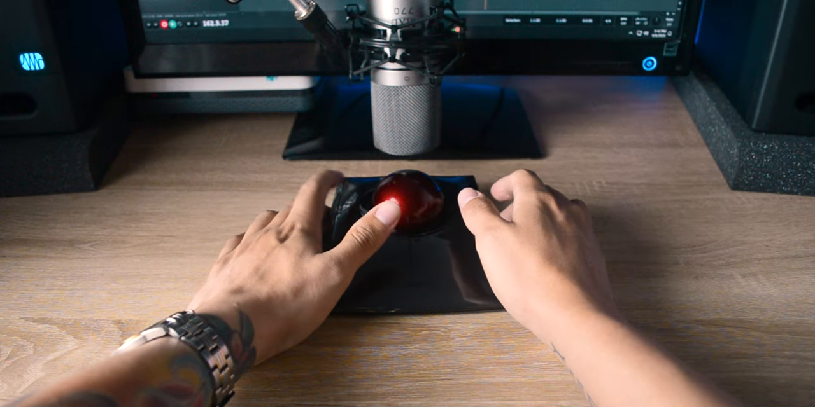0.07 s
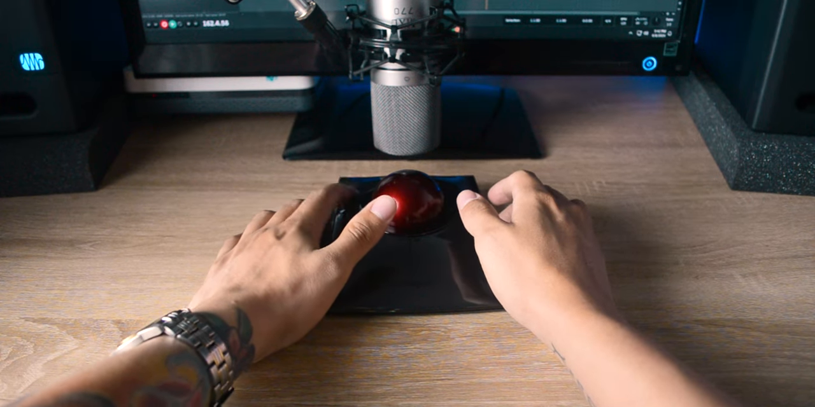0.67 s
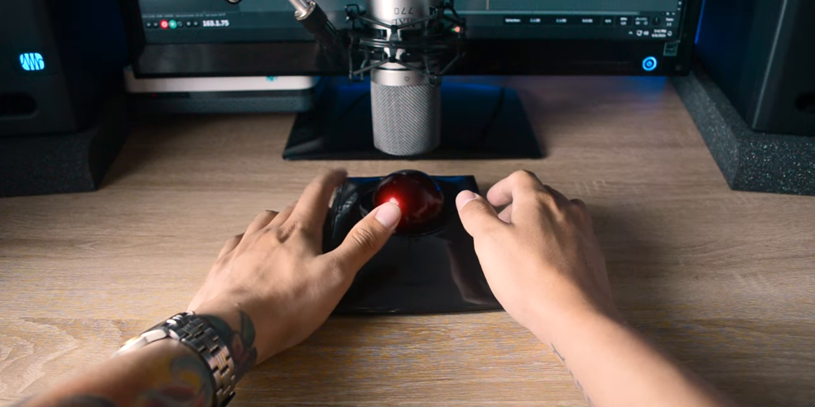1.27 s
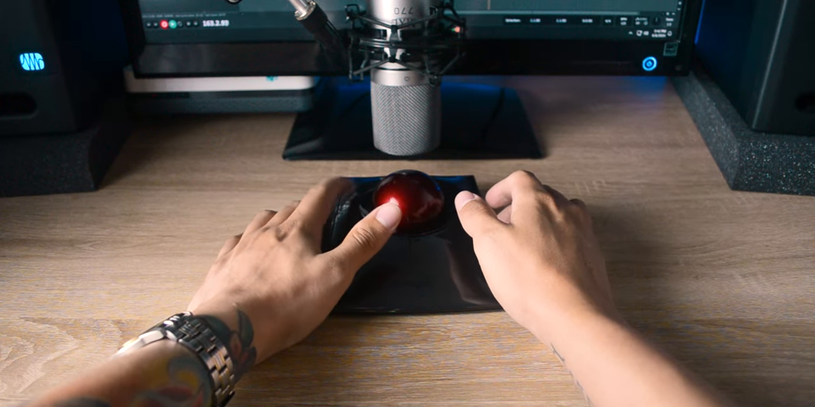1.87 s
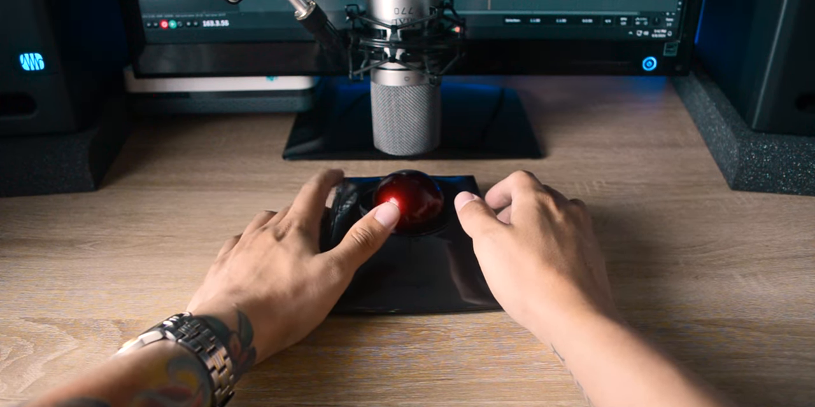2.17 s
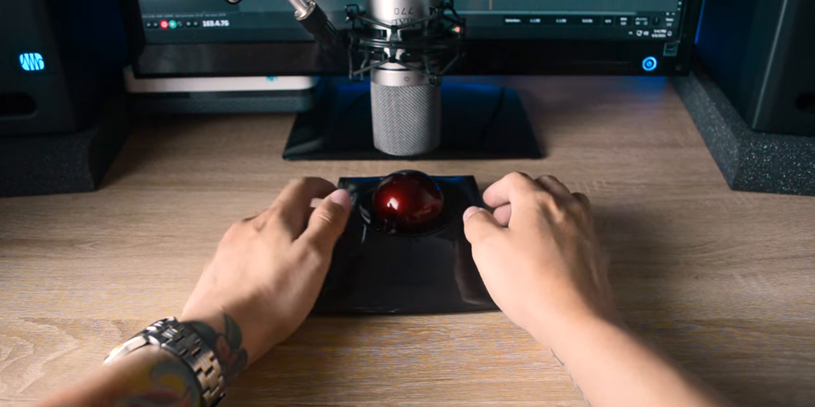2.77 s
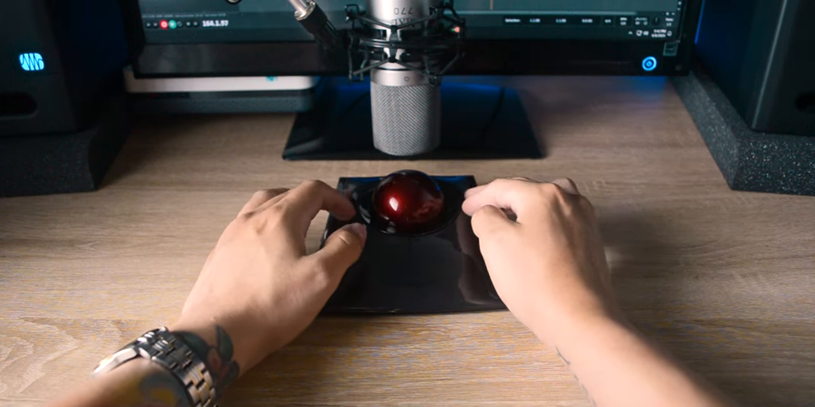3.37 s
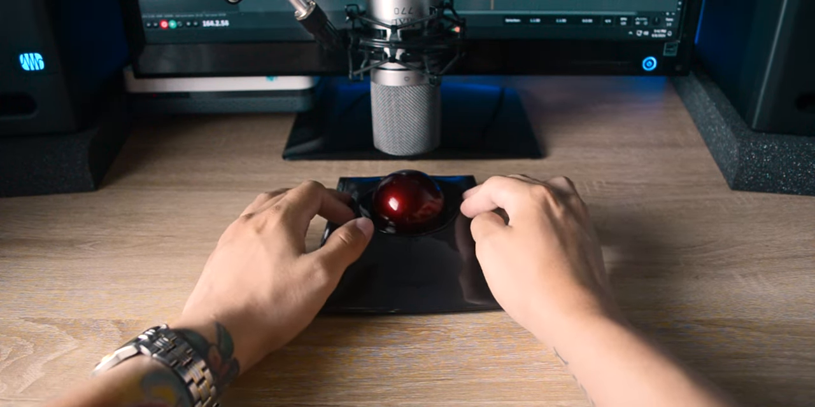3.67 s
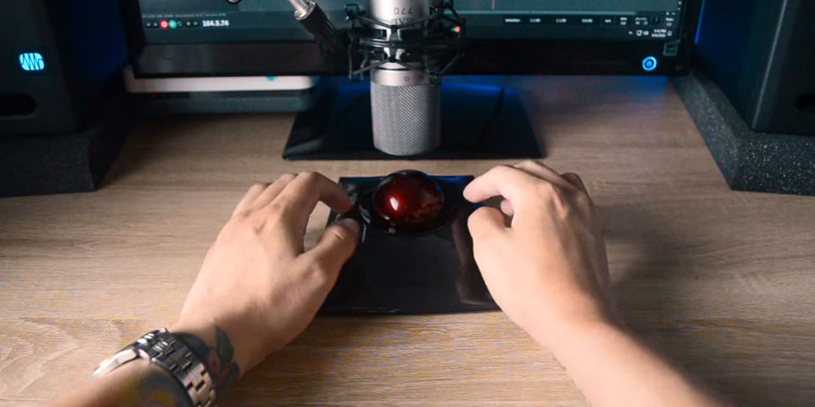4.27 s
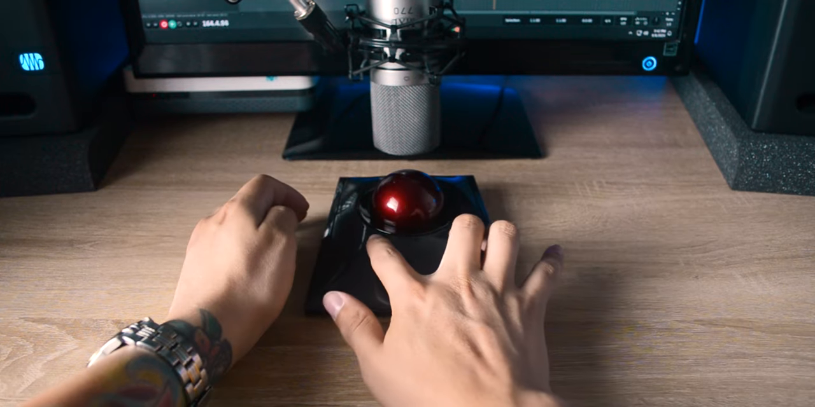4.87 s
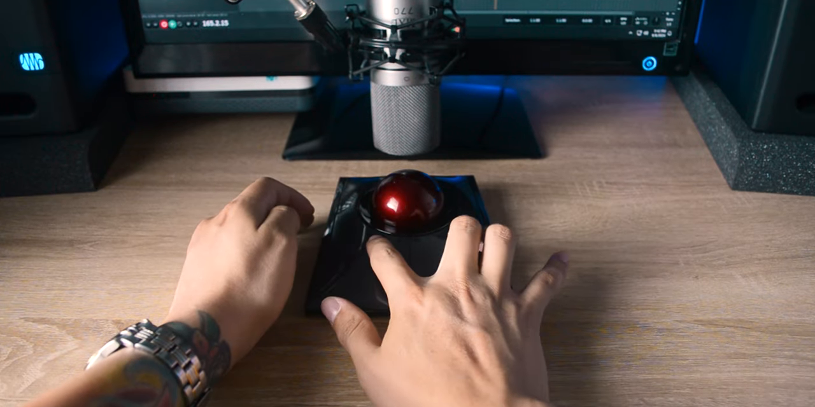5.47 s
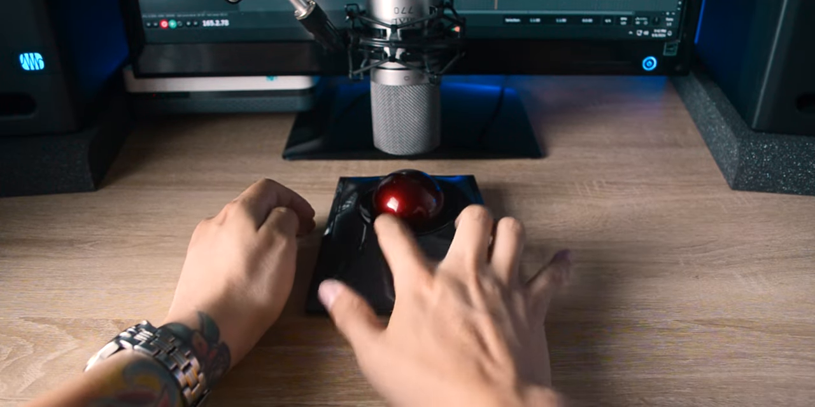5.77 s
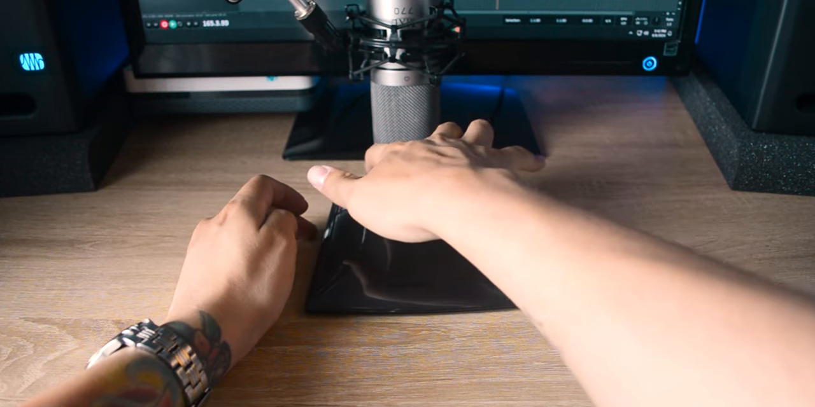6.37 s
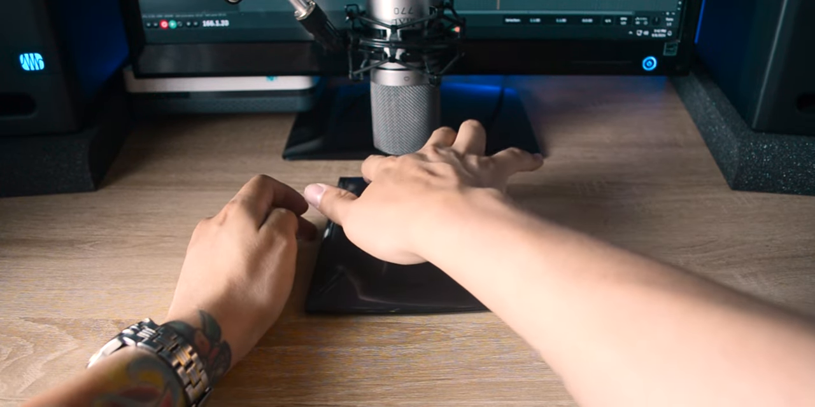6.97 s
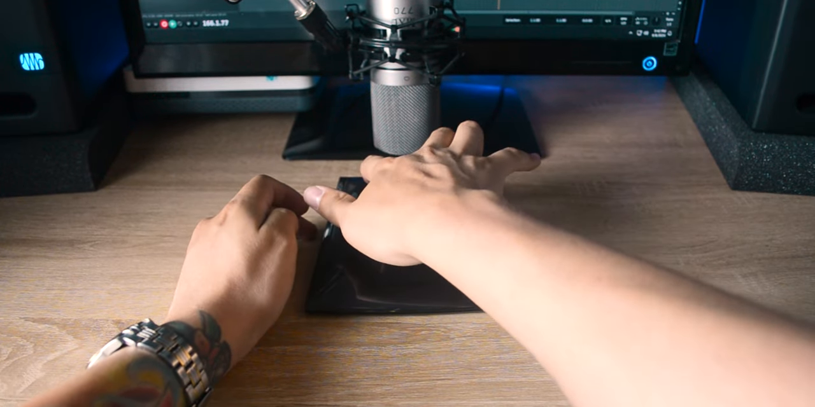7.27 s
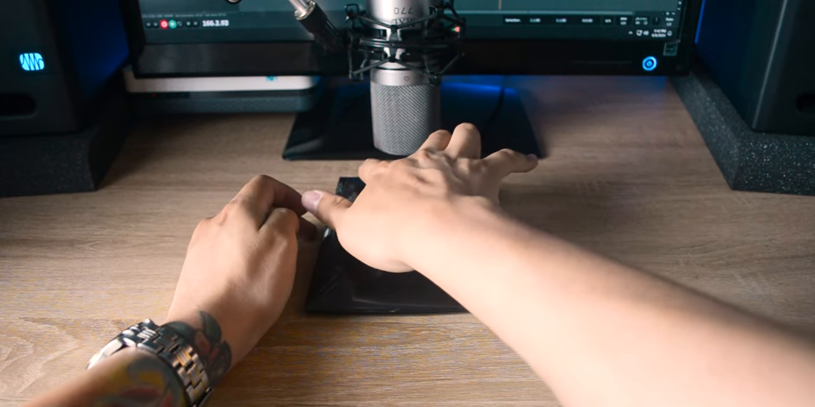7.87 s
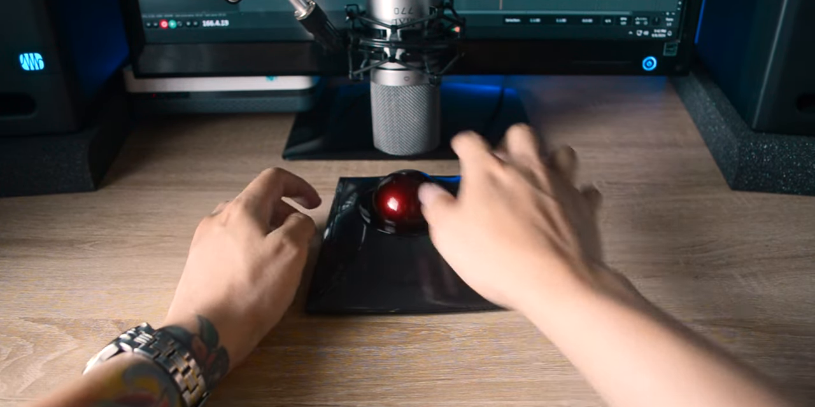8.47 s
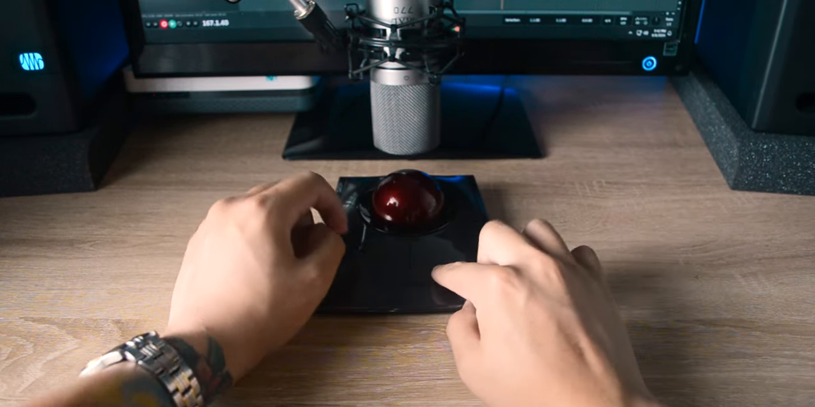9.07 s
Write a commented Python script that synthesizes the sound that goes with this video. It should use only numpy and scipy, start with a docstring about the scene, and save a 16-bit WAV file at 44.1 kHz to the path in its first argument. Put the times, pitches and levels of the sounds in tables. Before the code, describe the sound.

A trackball on a wooden desk is clicked close to a microphone in a quiet room. First one button snaps down and springs back in a quick, even run. After a pause the scroll wheel ticks through four notches, then a small button gives six faster clicks with dull thumps. A last button clicks about seven times, bright and steady. Light finger knocks and faint rustles on the plastic housing fall between the runs.

```python
"""Trackball buttons click one after another on a wooden desk, close under a studio microphone:
the left button, the scroll wheel, a small extra button, then the right button.
Each switch snaps brightly and knocks the plastic shell, which rings and shakes the desk.
Between the clicks, fingers tick, knock and rustle on the housing in a quiet room."""
import sys
import numpy as np
from scipy import signal
from scipy.fft import rfft, irfft
from scipy.io import wavfile
from scipy.ndimage import uniform_filter1d

SR = 44100
rng = np.random.default_rng(int(sys.argv[2]) if len(sys.argv) > 2 else 0)


def waveform_to_disk(signal):
    """Save audio, clipped to [-1, 1], as 16-bit WAV at the path in sys.argv[1]."""
    frames = np.transpose(np.atleast_2d(signal))
    scaled = np.clip(frames, -1, 1) * 32767
    samples = np.round(scaled).astype(np.int16)
    wavfile.write(sys.argv[1], SR, samples)


N = 406602
SIZE, LEAD = 16384, 2048  # samples in one stroke's buffer, and of those ahead of the contact
HZ = np.fft.rfftfreq(SIZE, 1 / SR)
AGE = (np.arange(SIZE) - LEAD) / SR  # seconds since the contact

# Right button going down, ever slower. Each row: start in seconds, travel to the stop in seconds.
RIGHT_DOWN = [(6.5722, 0.0029), (6.8642, 0.0033), (7.142, .012), (7.4018, .0157), (7.6761, .0189),
              (7.9648, 0.025), (8.222, 0.05)]
# Right button coming up. Each row: start in seconds, travel to rest in seconds, snap in dB.
RIGHT_UP = [(6.4272, 0.0023, -21.5), (6.7242, 0.0029, -23), (6.9917, 0.021, -24), (7.2705, 0.0027, -24),
            (7.5268, .0261, -24.5), (7.8091, 0.033, -26), (8.082, 0.023, -25.5)]


def left_button(bite_db=1.65, return_snap_db=-26.5):
    """A press snaps and knocks with the finger's force; the spring snaps back equally loud each time."""
    # Each row: press in seconds, release in seconds, force in dB, knock of the returning cap in dB.
    clicks = [(-.11, -0.004, -19, -32.5), (0.1481, 0.2492, -16.5, -37), (0.3723, 0.4702, -24, -35),
              (0.5935, 0.693, -16.5, -29), (0.8344, 0.9214, -18, -29), (1.0613, 1.1568, -23.5, -32.5),
              (1.2955, 1.3866, -16, -29), (1.543, 1.6307, -20.5, -40.5), (1.7545, 1.8436, -25, -28),
              (1.9878, 2.0688, -22.5, -28.5), (2.2043, 2.2842, -17, -29), (2.4301, 2.535, -15.5, -28)]
    # Broad tone of press and release. Each row: frequency in Hz, level in dB.
    press_colour = [(71, -58.5), (120, -23.5), (400, -12.5), (493, -5.5), (656, 2), (874, -7.5), (1520, -4),
                    (2020, -12), (2430, -7.5), (2700, -8), (4230, -22), (5300, -16.5), (8660, -18),
                    (12300, -26), (16000, -31)]
    release_colour = [(88, -62.5), (150, -29.5), (649, 0.5), (821, -18.5), (941, -9.5), (1260, -7.5),
                      (1660, -3.5), (3700, -24), (5680, -13), (10200, -16), (11700, -18.5), (12400, -29),
                      (14500, -16), (16000, -35.5)]
    # Their resonances. Each row: frequency in Hz, width in Hz, strength in dB.
    press_rings = [(345, 8.8, 4.5), (648, 45, 7), (1044, 70, 9), (1263, 35, 8), (1520, 220, 5),
                   (1923, 45, 10.5), (2397, 62, 9.5), (2940, 38, 1.5), (6270, 230, 4), (6850, 530, 5)]
    release_rings = [(343, 29, 1.4), (627, 23, 7), (947, 72, 11), (1380, 60, 2), (1590, 23, 4.6),
                     (2500, 55, 6.1), (5820, 130, 11), (7370, 140, 2), (8760, 280, 7.1), (11540, 150, 20),
                     (14110, 73, 9)]
    presses = [(s, force_db + bite_db, force_db) for s, _, force_db, _ in clicks]
    releases = [(s, return_snap_db, knock_db) for _, s, _, knock_db in clicks]
    down = switch(presses, press_colour, press_rings, rise_ms=0.82, snap_ms=3.3, shell_ms=4, lag_ms=0.5,
                  snap_tail=(-21, 0.13), shell_tail=(-14, 0.12), bend=1.8, desk_db=-27,
                  hiss_db=-19, hiss_s=0.0014, tail_follow=0.85)
    up = switch(releases, release_colour, release_rings, rise_ms=0.062, snap_ms=3, shell_ms=13,
                lag_ms=3.9, snap_tail=(-19.5, 0.06), shell_tail=(-14, 0.031), bend=2.2, desk_db=-33,
                hiss_db=-24.5, hiss_s=0.017)
    return down + up + spring(clicks)


def spring(clicks, waver_s=0.008):
    """The left button's bent spring buzzes thinly until the finger lets go."""
    # Each row: frequency in Hz, level against the force in dB, 60 dB decay in seconds.
    modes = [(1210, -33, 0.36), (1570, -31, .3), (4310, -44.5, 0.28), (6760, -46.5, .35)]
    out = np.zeros(N)
    for s, release_s, force_db, _ in clicks:
        wavers = smooth_noise((len(modes), SIZE), round(waver_s * SR))
        buzz = sum(amp(db) * ring(hz, t60) * waver / rms(waver)
                   for (hz, db, t60), waver in zip(modes, wavers))
        add(out, s + AGE[0], amp(force_db) * buzz * (AGE < release_s - s))
    return out


def scroll_wheel(settle_s=0.008, snap_share=0.2):
    """At every notch the detent lifts, drops, bounces and settles; force goes mostly into the shell."""
    # Each row: start, ride over the tooth and bounce, all in seconds, then force in dB.
    notches = [(3.4809, 0.02, 0.0068, -0.9), (3.679, 0.02, 0.0031, -3), (3.9153, .0054, .0101, 1.1),
               (4.1113, 0.0029, 0.0053, 4.5)]
    # The four contacts of a notch. Each row: snap in dB, knock in dB.
    contacts = [(-28, -33.5), (-24, -31.5), (-24.5, -34), (-30, -30.5)]
    # Broad tone. Each row: frequency in Hz, level in dB.
    colour = [(71, -41), (120, -21.5), (483, -10), (617, -0.5), (1580, -10.5), (2380, -18.5), (3660, -16),
              (4410, -12), (5520, -1.5), (6240, -4), (7350, -2), (7980, -2), (13900, -10.5), (16000, -15)]
    # Resonances. Each row: frequency in Hz, width in Hz, strength in dB.
    rings = [(353, 110, 5), (570, 18, -2), (750, 19, 0), (1400, 120, -16), (2310, 250, 8.5),
             (5840, 640, -0.5), (7300, 400, 2), (11700, 470, 6)]
    strokes = []
    for s, ride_s, bounce_s, force_db in notches:
        times = s + np.cumsum([0, ride_s, bounce_s, settle_s])
        for at, (snap_db, knock_db) in zip(times, contacts):
            strokes.append((at, snap_db + snap_share * force_db, knock_db + force_db))
    return switch(strokes, colour, rings, rise_ms=0.48, snap_ms=1.46, shell_ms=2.34,
                  snap_tail=(-19.5, 0.24), shell_tail=(-12, 0.18), bend=0.49, desk_db=-30)


def small_button(muffle=0.74, thump_hz=160, thump_t60=0.13):
    """A firm finger muffles the switch and hits the stop harder, where the housing thumps and rings."""
    # Each row: start in seconds, travel to the stop in seconds, force in dB, housing thump in dB.
    presses = [(4.9494, 0.011, -3.1, -39), (5.1034, .0072, 0.1, -58), (5.2546, 0.013, -4.5, -37.5),
               (5.385, 0.019, -0.4, -47), (5.5256, .0128, -5, -36), (5.6855, 0.0096, 0.3, -49)]
    # The switch trips, then the cap meets the stop. Each row: snap in dB, knock in dB.
    contacts = [(-30.5, -31.5), (-24, -34.5)]
    # Broad tone. Each row: frequency in Hz, level in dB.
    colour = [(30, -42), (71, -32), (120, -11), (321, -15), (712, 4.5), (911, -2.5), (2020, -13),
              (3310, -15), (5870, -7.5), (6500, -9), (7200, -3), (8840, -5.5), (9590, -5.5), (10400, -8.5),
              (16000, -14)]
    # Resonances. Each row: frequency in Hz, width in Hz, strength in dB.
    rings = [(574, 19, 1), (1950, 58, 2), (6040, 240, 5.5), (7200, 380, 5.5), (9550, 400, 5.5),
             (13600, 900, 5)]
    (trip_snap_db, trip_knock_db), (stop_snap_db, stop_knock_db) = contacts
    strokes, thumps = [], []
    for s, travel_s, force_db, thump_db in presses:
        strokes.append((s, trip_snap_db - muffle * force_db, trip_knock_db + force_db))
        strokes.append((s + travel_s, stop_snap_db + force_db, stop_knock_db + force_db))
        thumps.append((s + travel_s, thump_db, thump_hz, thump_t60))
    clicks = switch(strokes, colour, rings, rise_ms=0.62, snap_ms=1.5, shell_ms=2.1,
                    snap_tail=(-19, 0.25), shell_tail=(-14.5, 0.22), bend=0.63, desk_db=-24.5)
    return clicks + knocks(thumps) + hollow_shell([s for s, *_ in thumps], db=-32.5, hz=635, t60=0.078)


def right_button(settle_s=0.035, return_knock_db=-42.5, rest_snap_db=-28, rest_knock_db=-48):
    """Two contacts going down and two coming up; the slower the finger, the further apart they fall."""
    # The switch trips, then the cap meets the stop. Each row: snap in dB, knock in dB.
    contacts = [(-25, -29), (-22.3, -25.5)]
    # Broad tone of press and release. Each row: frequency in Hz, level in dB.
    press_colour = [(88, -64), (150, -39.5), (545, 0.5), (689, -5.5), (979, 1), (1340, -3), (2220, -6.5),
                    (4240, -13), (5460, -3.5), (6390, -3.5), (7180, -0.5), (10400, -6.5), (11700, -3),
                    (16000, -20)]
    release_colour = [(71, -64), (120, -17.5), (463, -13.5), (822, -11), (1190, -14.5), (2200, -18),
                      (4060, -21), (5410, -11.5), (6240, -6), (7350, -5), (7980, -8), (13300, -6),
                      (14700, -12), (16000, -13)]
    # Resonances with the cap free, at the stop and returning.
    # Each row: frequency in Hz, width in Hz, strength in dB.
    trip_rings = [(362, 43, 10.5), (959, 26, 8.5), (1860, 47, 8.5), (8700, 400, 1), (12700, 510, -13.5)]
    stop_rings = [(323, 50, 2), (558, 25, 5.5), (1023, 26, 2.5), (1920, 41, 7), (2290, 470, 10),
                  (5500, 240, 6), (7230, 320, 2), (12700, 510, -14)]
    release_rings = [(815, 19, 1.5), (1070, 27, -16), (5500, 440, 9), (7200, 153, -6), (7370, 380, 9),
                     (8440, 250, 4.5), (14500, 880, -23)]
    trip, stop = contacts
    trips = [(s, *trip) for s, _ in RIGHT_DOWN]
    stops = [(s + travel_s, *stop) for s, travel_s in RIGHT_DOWN]
    releases = []
    for s, travel_s, snap_db in RIGHT_UP:
        releases += [(s, snap_db, return_knock_db), (s + travel_s, rest_snap_db, rest_knock_db)]
    out = switch(trips, press_colour, trip_rings, rise_ms=0.68, snap_ms=1.6, shell_ms=5, lag_ms=0.15,
                 snap_tail=(-21.5, 0.091), shell_tail=(-11.5, 0.065), bend=0.57, desk_db=-36.5)
    out += switch(stops, press_colour, stop_rings, rise_ms=0.87, snap_ms=1.1, shell_ms=2.2, lag_ms=0.17,
                  snap_tail=(-25, 0.047), shell_tail=(-15.5, 0.087), bend=0.43, desk_db=-43)
    out += switch(releases, release_colour, release_rings, rise_ms=0.65, snap_ms=1.434, shell_ms=3.56,
                  snap_tail=(-22, 0.052), shell_tail=(-10.5, 0.044), bend=2.26, desk_db=-16)
    return out + hollow_shell([s + settle_s for s, *_ in stops], db=-44.5, hz=640, t60=0.085)


def switch(strokes, colour, rings, rise_ms, snap_ms, shell_ms, snap_tail, shell_tail, bend, desk_db,
           lag_ms=0.1, hiss_db=-24, hiss_s=0.002, tail_follow=0, split_hz=3500, damping_hz=45):
    """The spring snaps in the treble; the shell follows lower down and shakes the desk.
    Each stroke: start in seconds, snap in dB, knock in dB. Each tail: level in dB, decay in seconds."""
    out = np.zeros(N)
    snap_grain, shell_grain = rng.standard_normal((2, SIZE))  # the parts meet much alike each time
    treble = 1 / (1 + (split_hz / (HZ + 1)) ** 12)
    own_modes = ripple(170)
    hardest_db = max(knock_db for _, _, knock_db in strokes)
    for s, snap_db, knock_db in strokes:
        detune = 1 + 0.0062 * rng.standard_normal()  # the finger loads the cap a little differently
        peaks = sum(amp(db) ** 2 / (1 + (2 * (HZ - hz * detune) / np.hypot(width, damping_hz)) ** 2)
                    for hz, width, db in rings)
        lift = np.sqrt(1 + peaks)
        gain = read(colour, HZ) * amp(1.5 * own_modes + 2 * ripple(150))
        linger = amp(tail_follow * (knock_db - hardest_db))  # with tail_follow, light strokes die sooner
        # a faint hiss swells just before each click and softens its attack
        hiss = amp(hiss_db) * haze((AGE < 0) * np.exp(-abs(AGE) / hiss_s))
        snap = strike(gain * np.sqrt(treble), lift, snap_grain, hiss,
                      rise_ms, snap_ms, 0, *snap_tail, linger, bend)
        shell = strike(gain * np.sqrt(1 - treble), lift, shell_grain, hiss,
                       rise_ms, shell_ms, lag_ms, *shell_tail, linger, bend)
        add(out, s + AGE[0], amp(snap_db) * snap + amp(knock_db) * (shell + amp(desk_db) * desk()))
    return out


def strike(gain, lift, grain, hiss, rise_ms, fall_ms, lag_ms, tail_db, tail_s, linger, bend):
    """One part chatters on contact, then loose plastic and the room give a short tail."""
    likeness = 0.75  # how closely each stroke follows the part's own grain
    grain = likeness * grain + np.sqrt(1 - likeness ** 2) * rng.standard_normal(SIZE)
    contact = np.roll(chatter(grain, rise_ms, fall_ms), round(lag_ms * SR / 1000))
    onset = np.clip((AGE - 0.006) / 0.0047, 0, 1)
    fade = amp(-60 * (abs(AGE) / (tail_s * linger)) ** bend)  # bend over 1: it dies ever faster
    tail = amp(tail_db) * haze(onset * fade * catch_and_slip(depth_db=1.5))
    diffuse = rfft(hiss + tail) * 1.4 / lift ** 0.66  # hiss and tail excite the resonances less
    sound = irfft((rfft(contact) + diffuse) * causal(gain * lift))
    return sound / rms(sound[LEAD:LEAD + 353])  # the first 8 ms set the level


def chatter(grain, rise_ms, fall_ms):
    """A few milliseconds of contact chatter with a level spectrum and unit energy."""
    ms = np.maximum(AGE, 0) * 1000
    shape = (1 - np.exp(-ms / rise_ms)) * np.exp(-ms / fall_ms)
    burst = grain * shape
    for _ in range(4):
        whitened = irfft(np.exp(1j * np.angle(rfft(burst))))
        burst = whitened * np.sqrt(shape)
    return burst / np.linalg.norm(burst)


def hollow_shell(times, db, hz, t60, drift=0.032):
    """The hollow shell rings at each of these times, never at quite the same pitch."""
    return knocks([(s, db, hz * (1 + drift * rng.uniform(-1, 1)), t60) for s in times])


def desk():
    """The wooden desk booms in its low modes under one stroke."""
    # Each row: frequency in Hz, level in dB, 60 dB decay in seconds.
    modes = [(50, -10.5, 0.18), (82, -4.5, 0.28), (126, -1, 0.28), (180, -3.5, .12), (240, 1.5, 0.16)]
    return sum(amp(db) * ring(hz * rng.uniform(0.94, 1.06), t60) * rng.choice([-1, 1])
               for hz, db, t60 in modes)


def knocks(rows, scuff_db=-7, scuff_s=0.0096):
    """Each dull knock rings one low mode, with a short scuff around its pitch."""
    out = np.zeros(N)
    for s, db, hz, t60 in rows:
        band = signal.butter(2, [hz / 2, hz * 2], "bandpass", fs=SR, output="sos")
        scuff = signal.sosfilt(band, haze((AGE > 0) * np.exp(-abs(AGE) / scuff_s)))
        add(out, s + AGE[0], amp(db) * (ring(hz, t60) + amp(scuff_db) * scuff / abs(scuff).max()))
    return out


def hands():
    """Ticks, knocks and rustles as the fingers work the trackball."""
    # Nails and loose caps touch the shell. Each row: start in seconds, snap in dB, knock in dB.
    touches = [(2.745, -63, -66), (4.395, -50.5, -48), (5.74, -45, -41.5), (5.78, -52, -46.5),
               (6.131, -56, -54), (6.156, -46.5, -38), (6.278, -49.5, -57), (8.247, -42, -44.5),
               (8.2898, -37, -35.5), (8.813, -67.5, -84), (9.096, -65.5, -56.5)]
    # Their broad tone. Each row: frequency in Hz, level in dB.
    colour = [(40, -24), (150, -11), (400, -28), (700, -2.5), (1600, 0.5), (2400, -4.5), (4000, -10.5),
              (7500, -5.5), (12000, -15), (16000, -32)]
    # Fingers bump wheel, shell and desk.
    # Each row: start in seconds, level in dB, pitch in Hz, 60 dB decay in seconds.
    bumps = [(3.504, -37.5, 197, 0.097), (3.752, -36.5, 585, 0.12), (4.392, -36.5, 138, 0.099),
             (5.72, -31, 603, .096), (6.141, -47.5, 92.1, 0.097), (6.311, -47, 87.5, .1),
             (6.315, -35.5, 678, 0.04), (8.685, -51, 138.4, .063), (9.098, -51.5, 98, .074)]
    ticks = switch(touches + landings(), colour, rings=[], rise_ms=0.84, snap_ms=1.2, shell_ms=4.05,
                   snap_tail=(-18.5, 0.058), shell_tail=(-13, 0.093), bend=1, desk_db=-25.5)
    return ticks + knocks(bumps) + grainy_swells()


def landings(lead_s=0.025, first_db=-57.5, fade_db_per_s=27.5):
    """The fingertip taps the right cap just before each stroke, more softly as it finds its place."""
    times = np.sort([s for s, *_ in RIGHT_DOWN + RIGHT_UP])
    levels = first_db - fade_db_per_s * (times - times[0])
    return [(s - lead_s, db, db) for s, db in zip(times, levels)]


def grainy_swells():
    """Faint swells of grainy noise, and one short bright knock at the wheel's last notch."""
    # Each row: peak time in seconds, length in seconds, level in dB, centre in Hz, spread in octaves.
    swells = [(2.588, 0.056, -60.5, 5000, 1.5), (2.848, 0.058, -63.5, 1850, .45),
              (3.16, 0.17, -75, 5640, 0.53), (4.121, 0.015, -29, 2020, 0.5), (4.402, 0.048, -60, 2205, 1.8),
              (4.47, .11, -61.5, 110, 1.08), (4.523, 0.11, -65.5, 5800, 1.1),
              (4.912, .09, -77, 2960, 0.044), (8.329, 0.052, -60, 3500, 1.23),
              (8.616, 0.098, -74, 5030, .71), (9.042, 0.14, -76, 3800, 1.44)]
    out = np.zeros(N)
    for s, length, db, hz, octaves in swells:
        swell = np.exp(-2 * ((AGE - AGE.mean()) / length) ** 2)
        band = np.exp(-0.5 * (np.log2((HZ + 1) / hz) / octaves) ** 2)
        grain = rng.standard_normal(SIZE) * catch_and_slip(depth_db=6)
        noise = irfft(rfft(grain) * band * amp(3.6 * ripple(400)))
        add(out, s - SIZE / SR / 2, amp(db) * swell * noise / rms(noise))
    return out


def room():
    """Low room noise; the background level gently rises and falls."""
    # Broad tone. Each row: frequency in Hz, level in dB.
    colour = [(20, -16.5), (40, -9.5), (75, -11.5), (130, -7), (250, -3), (400, -14), (650, -15.5),
              (1200, -20.5), (2500, -30.5), (6000, -35), (11000, -41.5), (16000, -63.5)]
    # Loudness curve. Each row: time in seconds, level in dB.
    levels = [(0, -75), (2.5, -72), (2.75, -67), (6.2, -68.5), (6.6, -76.5), (8.1, -71), (8.4, -68),
              (9.2, -68)]
    s, db = np.transpose(levels)
    noise = irfft(rfft(rng.standard_normal(N)) * read(colour, np.fft.rfftfreq(N, 1 / SR)), N)
    return noise / rms(noise) * amp(np.interp(np.arange(N) / SR, s, db))


def ring(hz, t60, attack_s=0.001):
    """A softly struck mode that falls 60 dB in t60 seconds."""
    age = np.maximum(AGE, 0)
    attack = 1 - np.exp(-age / attack_s)
    return np.sin(2 * np.pi * hz * age) * attack * np.exp(-np.log(1000) * age / t60)


def ripple(width_hz):
    """Random peaks and dips across the spectrum: the many weak modes of a plastic shell."""
    wavy = smooth_noise(len(HZ), round(width_hz * SIZE / SR))
    return wavy / rms(wavy)


def catch_and_slip(depth_db):
    """A gain that jumps about every few milliseconds, as surfaces catch and slip."""
    wavy = uniform_filter1d(rng.standard_normal(SIZE), 110)
    return amp(depth_db * wavy / rms(wavy))


def smooth_noise(shape, span):
    """Noise averaged twice over span points."""
    return uniform_filter1d(uniform_filter1d(rng.standard_normal(shape), span), span)


def haze(envelope):
    """Noise of unit energy under an envelope."""
    noise = envelope * rng.standard_normal(SIZE)
    return noise / np.linalg.norm(noise)


def causal(gain):
    """A response of this spectral shape that rings only after it is struck."""
    log_gain = np.log(np.maximum(gain / gain.max(), 1e-5))
    mirrored = np.concatenate([log_gain, log_gain[-2:0:-1]])
    return np.exp(np.conj(signal.hilbert(mirrored)))[:len(gain)]


def read(points, hz):
    """Gain of a spectrum given as points on a log-frequency axis."""
    point_hz, db = np.transpose(points)
    return amp(np.interp(np.log(hz + 1), np.log(point_hz + 1), db))


def add(mix, s, sound):
    """Mixes a sound in, starting at s seconds."""
    start = round(s * SR)
    part = mix[max(start, 0):max(start + len(sound), 0)]
    part += sound[max(-start, 0):][:len(part)]


def amp(db):
    """Decibels to gain."""
    return 10 ** (np.asarray(db) / 20)


def rms(x):
    """Root mean square."""
    return np.sqrt(np.mean(x ** 2) + 1e-30)


def scene():
    """All the switches, the hands and the room at one microphone."""
    return (left_button() + scroll_wheel() + small_button() + right_button() + hands() + room())[None]


def record(dry, edge_hz=16200):
    """Peaks clip at full scale, then a steep low-pass trims the top."""
    lowpass = signal.firwin(255, edge_hz, window=("kaiser", 9), fs=SR)
    return signal.oaconvolve(np.clip(dry, -1, 1), lowpass[None], "same")


dry = scene()
out = record(dry)
waveform_to_disk(out)
```